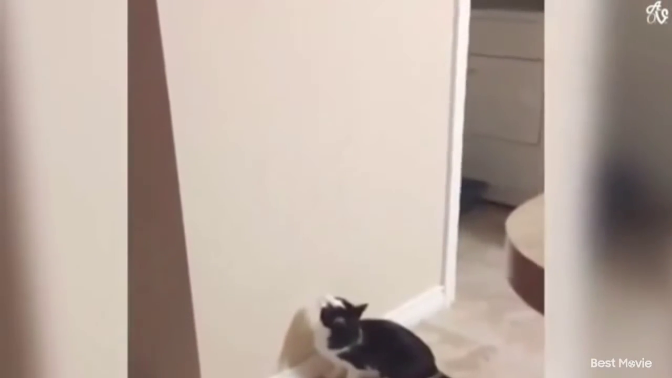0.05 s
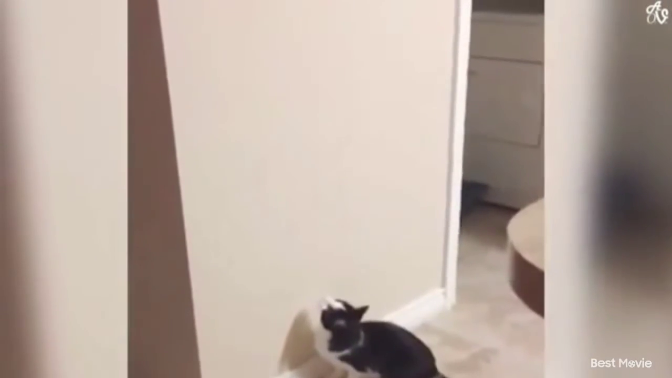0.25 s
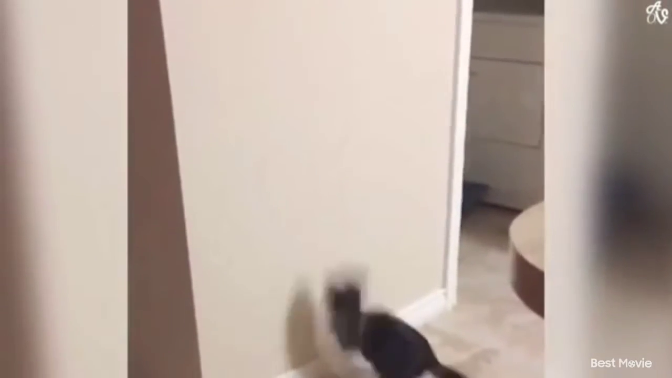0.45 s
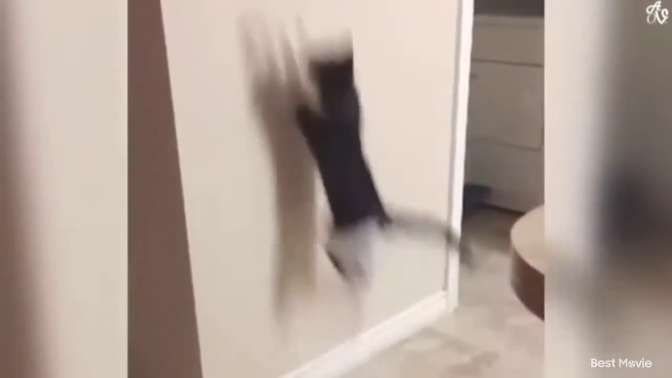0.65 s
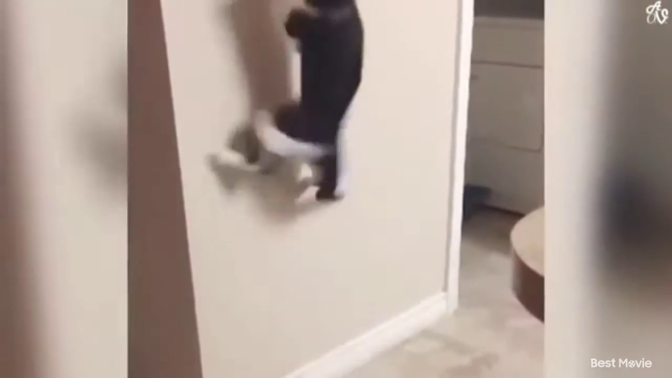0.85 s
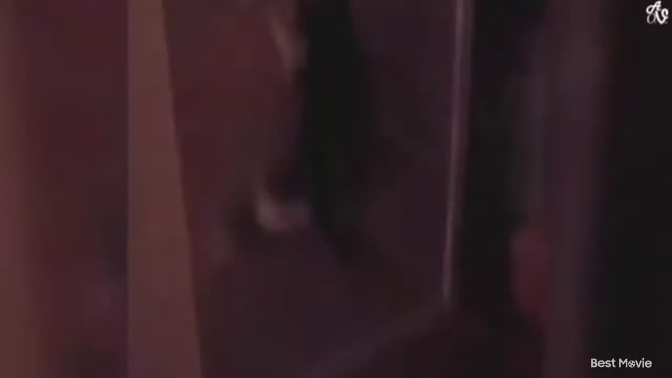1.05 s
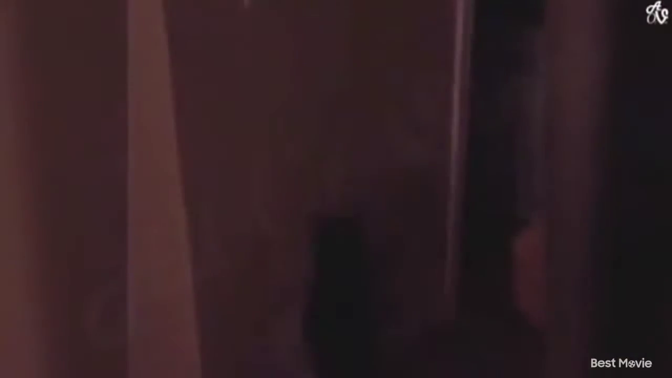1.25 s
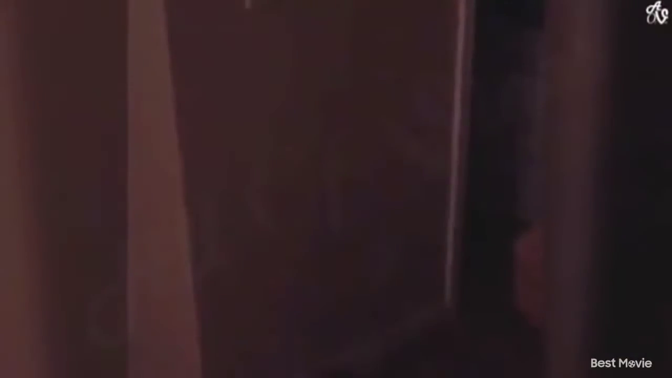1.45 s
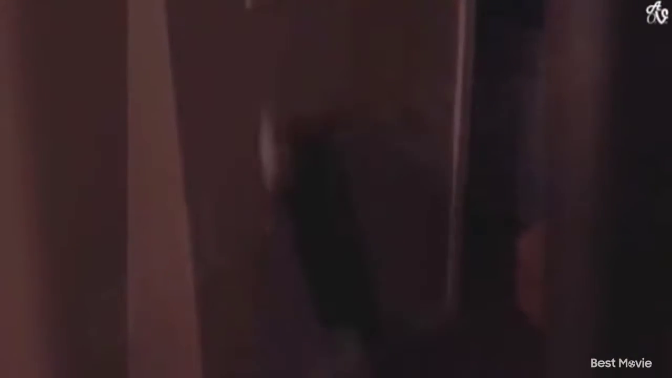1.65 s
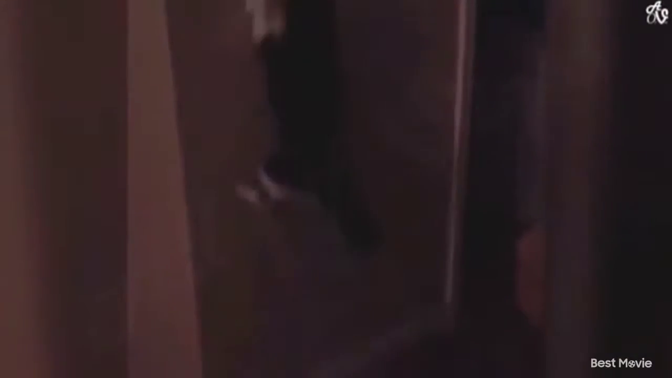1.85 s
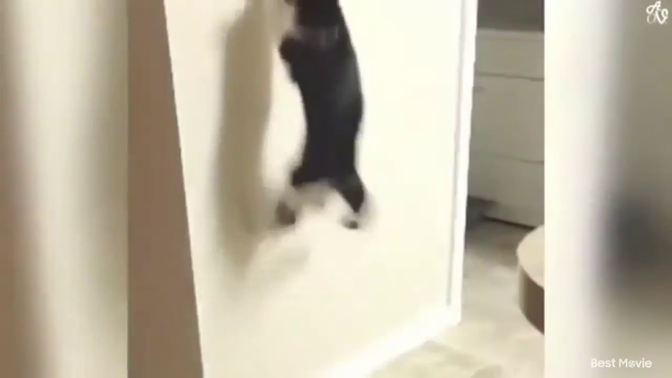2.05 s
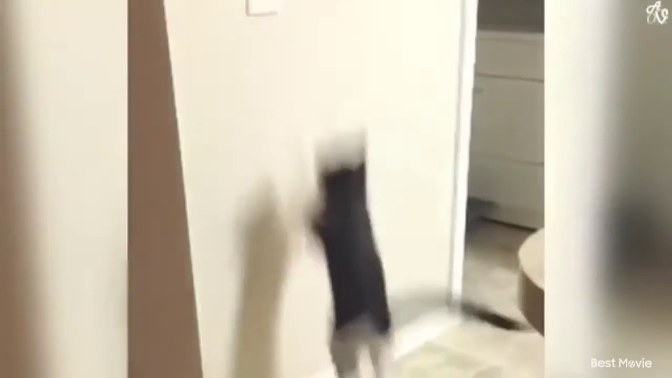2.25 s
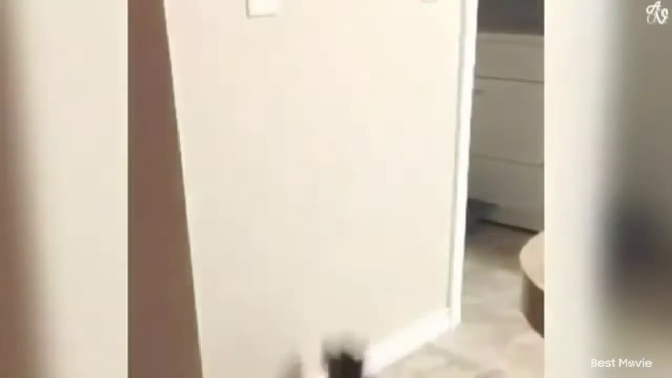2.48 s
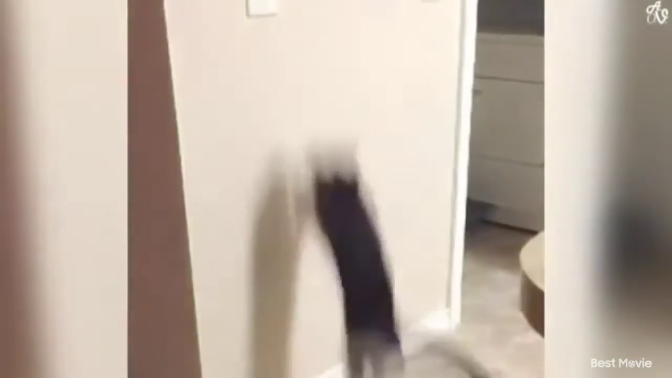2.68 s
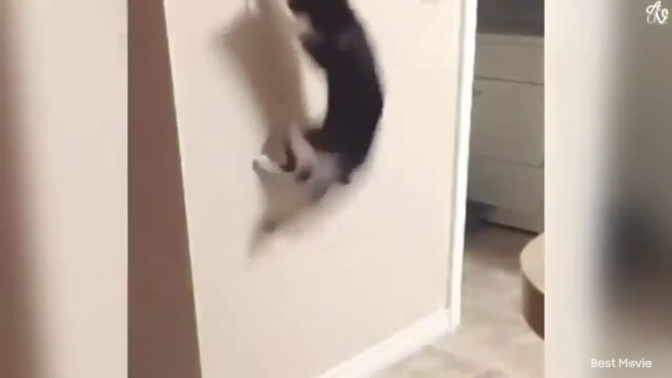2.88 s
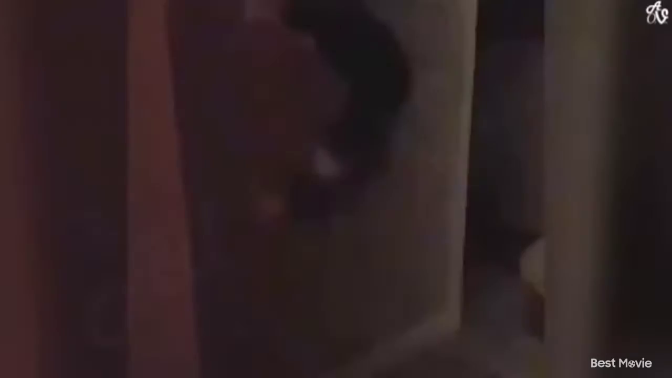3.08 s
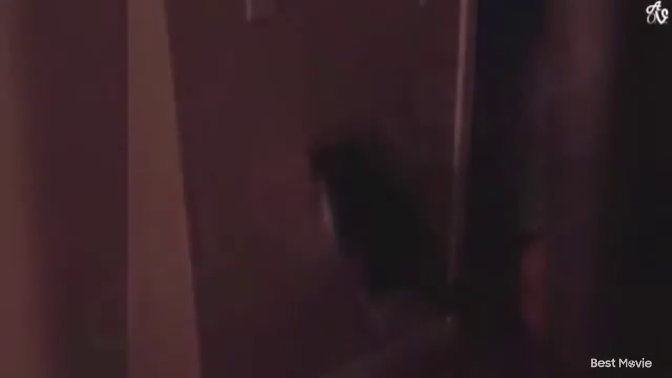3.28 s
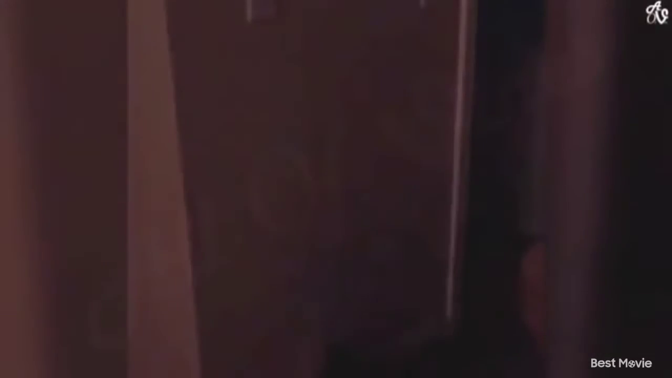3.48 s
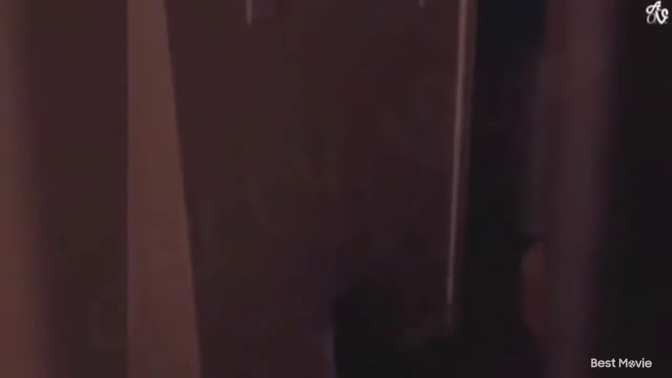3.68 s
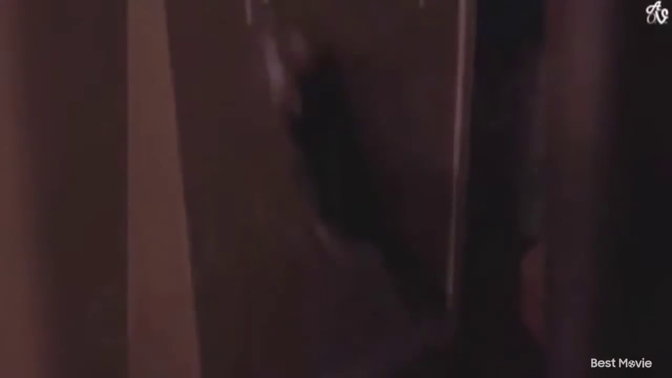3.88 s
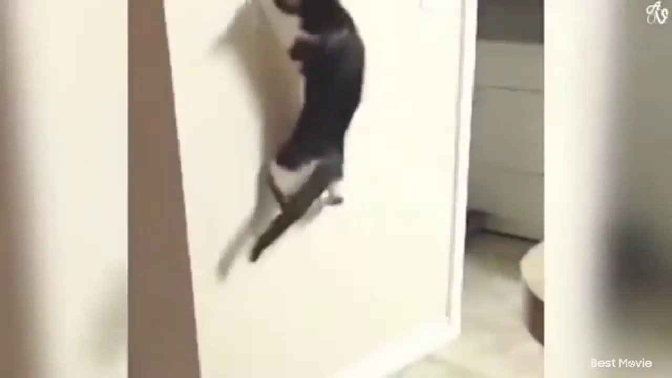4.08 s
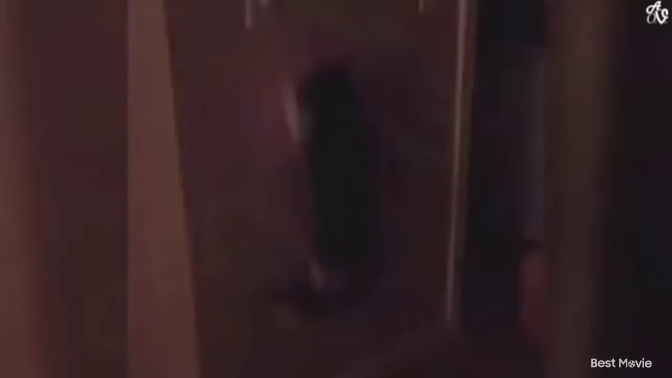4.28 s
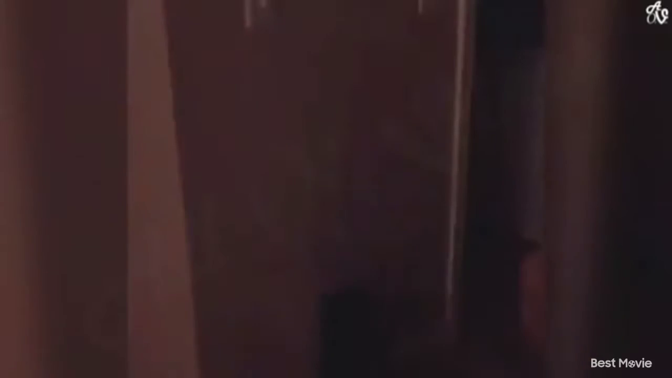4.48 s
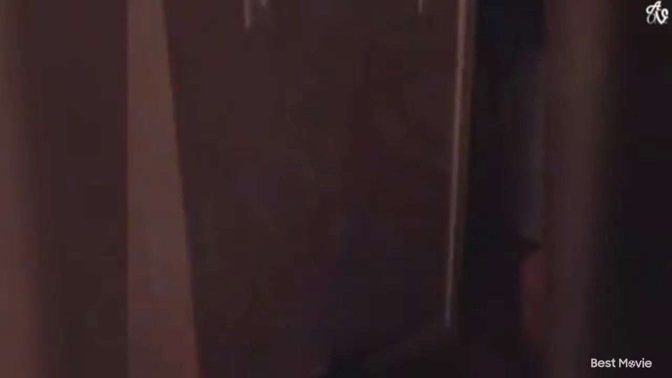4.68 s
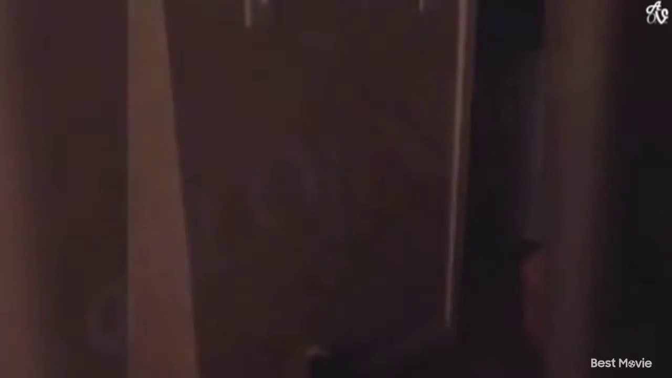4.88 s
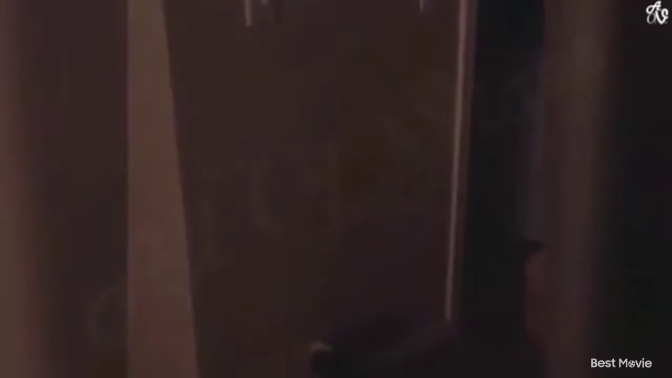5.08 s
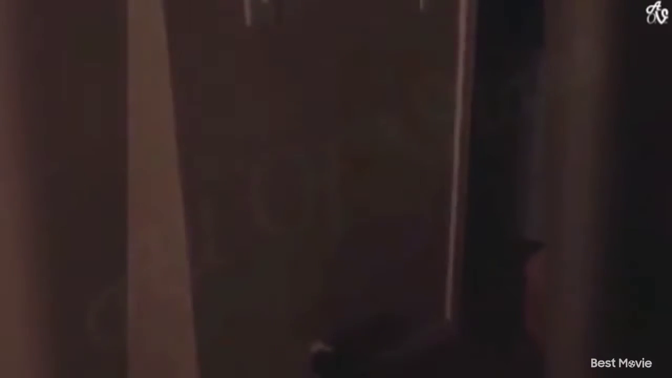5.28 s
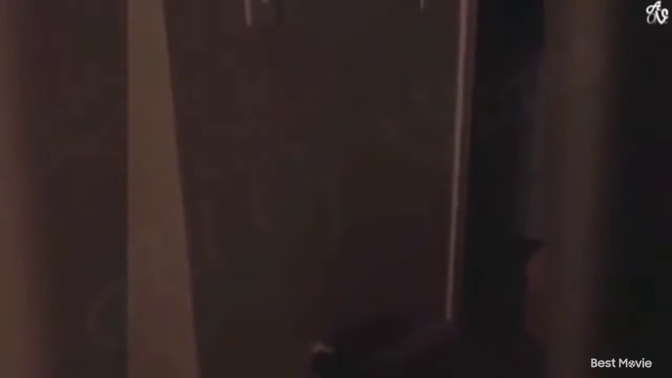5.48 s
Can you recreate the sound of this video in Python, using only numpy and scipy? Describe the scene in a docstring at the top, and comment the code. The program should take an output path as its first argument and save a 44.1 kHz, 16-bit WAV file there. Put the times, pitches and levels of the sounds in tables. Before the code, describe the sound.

A soft rumble and hiss fill a small room throughout. At about 0.3 seconds a cat pushes off with a very faint squeak and two padded steps. Its claws graze a hollow wall, scratching briefly around 1.1 seconds, and at 1.6 it lands with clicking nails and a quick double thump, fore paws then hind paws. More short scrapes and snags run from 2.1 to 2.5 seconds, followed by a second landing at 2.7. Claws scratch again near 3.1 and bite sharply at 3.4. The third and heaviest landing comes at 3.7, with fur and pads brushing softly around it. Further scratches and a crisp click fall between 4.2 and 4.5 seconds, before the last double thump at 4.8. Each contact rings briefly in the room, the thumps sounding hollow and boomy. A faint brush of fur comes at about 5.5 seconds.

```python
"""A cat leaps at a hollow indoor wall again and again, in a small room that rings after every contact.
Over a soft rumble and hiss, it pushes off with a faint squeak and padded steps that excite the boards.
Claws then graze, bite and snag on the paint in short bursts of stick-slip friction.
After each of four leaps it drops to the floor: nails click, fore paws thump, then hind paws.
Around the third landing, and again at the end, fur and pads brush past."""
import sys
import numpy as np
from scipy import signal
from scipy.fft import rfft, irfft, next_fast_len
from scipy.io import wavfile
from scipy.ndimage import uniform_filter1d

SR = 44100
rng = np.random.default_rng(int(sys.argv[2]) if len(sys.argv) > 2 else 0)


def file_out(sig):
    """Save sig as 16-bit WAV at sys.argv[1]."""
    # one column per channel
    cols = np.atleast_2d(sig).T
    # limit, then scale
    lim = np.clip(cols, -1, 1)
    pcm = np.round(lim * 32767).astype(np.int16)
    wavfile.write(sys.argv[1], SR, pcm)


N = 244204


def undb(db):
    """Decibels to amplitude ratio."""
    return 10 ** (np.asarray(db) / 20)

def seconds(length):
    """Time axis of the given length."""
    return np.arange(int(length * SR)) / SR

def at_hz(points, hz):
    """Interpolation on a log-frequency axis."""
    f, value = np.transpose(points)
    return np.interp(np.log(np.maximum(hz, 1)), np.log(f), value)

def unit(x):
    """Normalisation to unit energy."""
    return x / np.sqrt(np.sum(x ** 2))

def butter(hz, kind="low"):
    """Maximally flat filter of order two."""
    return signal.butter(2, hz, kind, fs=SR, output="sos")

def colour(x, points, size=2048):
    """Minimum-phase filtering to a shape of (Hz, dB) points."""
    cepstrum = irfft(np.log(undb(at_hz(points, np.fft.rfftfreq(size, 1 / SR)))))
    cepstrum[1:size // 2] *= 2
    cepstrum[size // 2 + 1:] = 0
    return signal.fftconvolve(x, irfft(np.exp(rfft(cepstrum))))[:len(x)]

def noise(points):
    """Coloured noise of unit rms."""
    return unit(colour(rng.standard_normal(N), points)) * np.sqrt(N)

def wander(rate_hz):
    """Smooth random modulation with a spread near one."""
    k = int(SR / rate_hz)
    return uniform_filter1d(np.repeat(rng.standard_normal(N // k + 1), k), k)[:N]

def fade(t, t60):
    """Exponential decay of 60 dB in t60 seconds."""
    return np.exp(-np.log(1000) * t / t60)

def ring(modes, t, scatter_db):
    """Modal superposition: damped modes, their weights varying with the spot struck."""
    return sum(undb(db + scatter_db * rng.standard_normal()) * fade(t, t60) * np.cos(2 * np.pi * hz * t)
               for hz, db, t60 in modes)

def add(out, s, x):
    """Superpose x on out at time s."""
    i = int(s * SR)
    out[i:i + len(x)] += x[:N - i]


# Background spectrum. Each row: frequency in Hz, level in dB.
AIR_SPECTRUM = [(18, -47), (30, -23), (32, -17), (89, -22), (150, 1.5), (205, 6), (296, -2), (629, -15.5),
                (716, -18.5), (774, -21.5), (1440, -36), (1560, -34.5), (2310, -40.5), (15000, -54.5)]

def air(rumble_db=-67, hiss_db=-72.5, step_s=3.42, step_db=3.5):
    """Broadband noise in two bands: a wavering rumble, and a hiss that steps up once."""
    bed = noise(AIR_SPECTRUM)
    rumble = unit(signal.sosfilt(butter(1200), bed)) * undb(rumble_db + 1.14 * wander(7.3))
    hiss = unit(signal.sosfilt(butter(1500, "high"), bed))
    hiss *= undb(hiss_db + step_db * (np.arange(N) / SR > step_s))
    return np.sqrt(N) * (rumble - hiss)

def squeak(s=.305, length_s=0.2, start_hz=2900, end_hz=2500, db=-75):
    """Random frequency modulation roughens a faint falling tone at the first push-off."""
    out, t = np.zeros(N), seconds(length_s)
    hz = np.interp(t, [0, length_s], [start_hz, end_hz]) * (1 + .11 * wander(1500)[:len(t)])
    swell = undb(db) * np.sin(np.pi * t / length_s)
    add(out, s, swell * np.sin(2 * np.pi * np.cumsum(hz) / SR))
    return room(out, wet_db=2, gap_s=0.0045)

# Decay of the room. Each row: frequency in Hz, reverberation time in seconds.
REVERB_TIMES = [(100, 0.4), (250, 0.46), (600, 0.31), (1500, 0.24), (4000, 0.29), (12000, 0.38)]

def room(x, wet_db, gap_s):
    """Reverberation: early reflections from near walls, then each octave dies at its own rate."""
    t = seconds(.5)
    spectrum = rfft(rng.standard_normal(len(t)))
    octave = np.log2(np.clip(np.fft.rfftfreq(len(t), 1 / SR), 125, 16000) / 125)
    early = 0.96 * fade(t, 0.077)
    tail = 0
    for k in range(8):
        band = irfft(spectrum * np.maximum(1 - abs(octave - k), 0), len(t))
        tail += band * (fade(t, at_hz(REVERB_TIMES, 125 * 2 ** k)) + early)
    tail = unit(tail * (1 - np.exp(-t / gap_s)))
    return x + undb(wet_db) * signal.oaconvolve(x, tail)[:len(x)]

def pad_blow(s, db):
    """Nonlinear contact: a pad pressed harder stiffens, doubling its bandwidth every 13 dB."""
    corner_hz = min(294 * 2 ** ((db + 61) / 13), SR / 10)
    return blow(s, db, corner_hz, boom_db=3.5, knock_db=10.5)

# Soft steps and push-offs. Each row: start in seconds, relative level in dB.
FOOTFALLS = [(.312, -56), (.360, -54), (3.569, -46), (4.283, -48.5)]

def steps():
    """Soft impacts: the pads alone drive the boards."""
    return [pad_blow(s, db) for s, db in FOOTFALLS]

# Modes of floor, wall and room. Each row: frequency in Hz, level in dB, 60 dB decay time in seconds.
BOOM_MODES = [(131, -34, 1), (141.2, -23, 0.7), (170.9, 3, 0.087), (198.5, 3.5, 0.11), (218, 0.5, 0.28),
              (253.2, 2.5, 0.21), (255, -17, 0.21), (334.6, -11, 0.21), (382.2, -6.5, 0.37),
              (406.4, -11, 0.32), (471, -22.5, 0.51), (606, -9, 0.32), (645.5, 0.5, 0.12), (877, -10, 0.4)]
# The dense, short knock of the boards. Each row: frequency in Hz, level in dB.
KNOCK_SPECTRUM = [(60, -16), (150, 0), (300, 7.5), (600, 0), (1200, -3), (2500, -1), (6000, 0.5),
                  (15000, -22)]

def blow(s, db, corner_hz, boom_db, knock_db):
    """Impact excitation: a softer pad wakes fewer high modes. Returns the start and the sound."""
    t = seconds(.25)
    boom = unit(ring(BOOM_MODES, t, scatter_db=-1.8))
    envelope = (1 - np.exp(-t / 0.0043)) * (fade(t, 0.13) + 1.24 * fade(t, 0.28))
    knock = unit(colour(rng.standard_normal(len(t)) * envelope, KNOCK_SPECTRUM))
    struck = colour(boom + undb(knock_db) * knock, [(160, boom_db), (300, 0)])
    cushioned = signal.sosfilt(butter(corner_hz), struck)
    return s, undb(db + 27) * unit(cushioned)

def bend(x, travel_s):
    """Dispersion of bending waves: 200 Hz takes travel_s, highs run faster, so a blow chirps down."""
    size = next_fast_len(len(x) + SR // 2)
    hz = np.fft.rfftfreq(size, 1 / SR)
    phase_lag = 4 * np.pi * travel_s * np.sqrt(200 * hz)
    return irfft(rfft(x, size) * np.exp(-1j * phase_lag), size)[:len(x)]

def thumps(blows, round_trip_s=.0395):
    """Radiation and echo: boards radiate little below their lowest mode; the far wall returns the boom."""
    boards = np.zeros(N)
    for s, sound in blows:
        add(boards, s, sound)
    out = signal.sosfilt(butter(115, "high"), bend(boards, travel_s=.013))
    echo = undb(-0.5) * signal.sosfiltfilt(butter([129, 220.4], "band"), out)
    add(out, round_trip_s, echo)
    return room(out, wet_db=-16.5, gap_s=0.038)

# Light touches of the claws. Each row: start in seconds, relative level in dB, brightness in dB.
CLAW_GRAZES = [(.771, -67, -3), (1.046, -69.5, 11), (1.294, -52, -3.5), (1.345, -62, 0), (2.089, -49.5, 6),
               (3.129, -47, 6), (3.402, -50.5, -2), (4.124, -66, 3.5), (4.230, -54, 9)]

def grazes():
    """Sliding friction: claws skim on, often just before a swipe bites."""
    return [scratch(s, db, bright_db, hollow_db=6, skid_s=0.03) for s, db, bright_db in CLAW_GRAZES]

# Board modes under a hard tap. Each row: frequency in Hz, level in dB, 60 dB decay time in seconds.
NAIL_MODES = [(840, -30, 0.029), (1020, -53, 0.058), (1570, -22.5, 0.022), (2176, -24.5, 0.014),
              (2900, -33, 0.062), (3115, -45, 0.13), (3303.6, -54, 0.041)]
# Spectrum of a nail contact. Each row: frequency in Hz, level in dB.
NAIL_SPECTRUM = [(60, -21.5), (200, -11), (450, -4), (900, -3.5), (1600, -3.5), (2400, -0.5), (3300, -5),
                 (4500, -9), (6000, -13), (8000, -19.5), (11000, -24.5), (15000, -30)]

def scratch(s, db, bright_db, hollow_db, skid_s, catches_per_s=3400):
    """Stick-slip friction: a nail catches and slips in fading ticks. Returns the start and the sound."""
    t = seconds(.1)
    catches = rng.random(len(t)) < catches_per_s / SR
    slips = catches * rng.standard_normal(len(t)) * np.exp(-(t / skid_s) ** 2)
    slips[0] += .7  # the tick of first contact
    ticks = unit(slips)
    modes = undb(-12) * ring(NAIL_MODES, t, scatter_db=2.5)
    tap = colour(ticks + signal.fftconvolve(ticks, modes)[:len(t)], NAIL_SPECTRUM)
    edge_db = -1.5 + 0.78 * bright_db
    tone = [(120, 0), (350, hollow_db), (900, hollow_db), (1800, 0.012), (3200, bright_db), (6500, edge_db)]
    return s, undb(db + 30.5) * colour(tap, tone)

def claws(scratches, spot_count=14):
    """Multipath: each spot on wall or floor has its own pattern of reflections."""
    spots = np.zeros((spot_count, N))
    for k, (s, sound) in enumerate(scratches):
        add(spots[k % spot_count], s, sound)
    return sum(room(spot, wet_db=1.5, gap_s=0.0019) for spot in spots)

GIVE_S = .003  # each thump starts just before its nails click
# Paw strikes, mostly swipes at the wall, one a second fore paw on the floor. Each row: start in seconds,
# relative claw level in dB, hollow band gain in dB, # brightness in dB, skid time in seconds, relative pad
# level in dB.
PAW_STRIKES = [(1.069, -45.5, 1, -7, 0.012, -67), (1.086, -39.5, -6.5, -2, 0.016, -54.5),
               (1.626, -42.5, 10.5, 0.5, 0.0088, -31.5), (2.099, -39.5, -4.5, -1.5, 0.017, -58),
               (2.165, -53.5, 7.5, 16, 0.003, -56), (2.218, -45, 2.5, -2.5, 0.024, -55.5),
               (2.457, -36, 9, 9.5, 0.026, -56), (3.157, -41, 1, 12.5, 0.009, -51.5),
               (3.427, -25, 2, -7, 0.0053, -33.5), (4.245, -36.5, -8.5, -11, .024, -55.5),
               (4.517, -39.5, 0, -9, 0.024, -69)]

def swipes():
    """Oblique impact: the pad strikes the wall or floor while the claws skid along it."""
    blows, scratches = [], []
    for s, claw_db, hollow_db, bright_db, skid_s, pad_db in PAW_STRIKES:
        blows.append(pad_blow(s - GIVE_S, pad_db))
        scratches.append(scratch(s, claw_db, bright_db, hollow_db, skid_s))
    return blows, scratches

# Drops to the floor. Each row: start in seconds; the fore paws' relative level, boom gain, relative nail
# level and nail brightness, all in dB; the hind paws' delay in seconds, relative level in dB, corner in Hz.
FLOOR_LANDINGS = [(1.596, -30.5, 2, -41, -17, .085, -25.5, 553),
                  (2.651, -35, 13.5, -40.5, -22, .089, -29, 474),
                  (3.703, -23, 4.5, -39.5, -3.5, .079, -17.5, 390),
                  (4.777, -33, 12, -60.5, 8.5, .095, -21, 550)]

def landings(toe_lead_s=.007, skid_s=0.0071):
    """Two-stage impact: fore paws land hard, then hind paws on softer pads, toes just ahead."""
    blows, scratches = [], []
    hind_tone = dict(bright_db=-7.5, hollow_db=-8)
    for s, fore_db, boom_db, nail_db, bright_db, delay_s, hind_db, hind_hz in FLOOR_LANDINGS:
        blows.append(blow(s - GIVE_S, fore_db, corner_hz=660, boom_db=boom_db, knock_db=12))
        scratches.append(scratch(s, nail_db, bright_db, hollow_db=7.5, skid_s=0.006))
        hind_s = s + delay_s
        blows.append(blow(hind_s - GIVE_S, hind_db, hind_hz, boom_db=-1, knock_db=1))
        weight_db = hind_db + 24.5  # under more weight, hind nails click louder and skid further
        loaded_skid_s = skid_s * 2 ** (weight_db / 5.5)
        scratches.append(scratch(hind_s, -36.5 + 0.67 * weight_db, skid_s=loaded_skid_s, **hind_tone))
        scratches.append(scratch(hind_s - toe_lead_s, hind_db - 24, skid_s=skid_s, **hind_tone))
    return blows, scratches

# Single nails catching. Each row: start in seconds, relative level in dB, brightness in dB.
NAIL_SNAGS = [(2.12, -45.5, 0.5), (2.286, -48.5, -8.5), (3.438, -37, -2.5), (4.252, -39.5, 5)]

def snags():
    """Arrested slip: a nail stops almost at once, with a crisp click."""
    return [scratch(s, db, bright_db, hollow_db=0.5, skid_s=0.0029) for s, db, bright_db in NAIL_SNAGS]

# Spectrum of rubbing fur and pads. Each row: frequency in Hz, level in dB.
FUR_SPECTRUM = [(40, -23), (90, -33), (160, 8), (320, -3), (600, -11), (900, -13.5), (1500, -20.5),
                (4000, -27.5), (8000, -31.5), (15000, -39)]
# Passes of the body. Each row: peak time in seconds, level in dB, half length in seconds.
FUR_BRUSHES = [(3.634, -45.5, 0.067), (3.868, -52.5, 0.15), (5.56, -57, 0.17)]

def brushes():
    """Friction noise: fur and pads brush past, swelling and fading with an uneven grip."""
    t = np.arange(N) / SR
    swell = sum(undb(db) * np.exp(-((t - s) / half_s) ** 2) for s, db, half_s in FUR_BRUSHES)
    grip_db = 2 * wander(70)
    return noise(FUR_SPECTRUM) * swell * undb(grip_db)

def scene():
    """Linear superposition of all sources at one point."""
    swipe_blows, swipe_scratches = swipes()
    landing_blows, landing_scratches = landings()
    paws = thumps(steps() + swipe_blows + landing_blows)
    nails = claws(landing_scratches + swipe_scratches + grazes() + snags())
    return (air() + squeak() + paws + nails + brushes())[None]

def record(dry, top_hz=15200):
    """Band limiting: a steep low-pass cuts the highest treble."""
    return signal.sosfilt(signal.ellip(10, .2, 80, top_hz, fs=SR, output="sos"), dry)


dry = scene()
out = record(dry)
file_out(out)
```